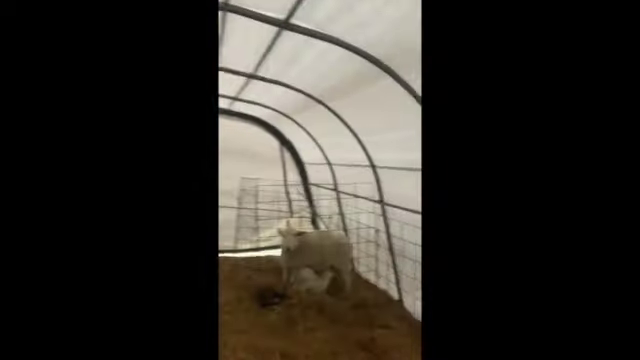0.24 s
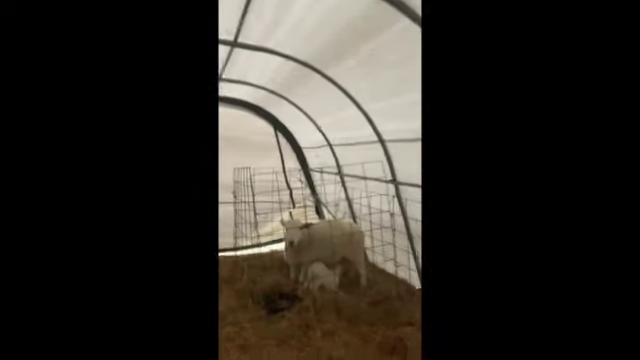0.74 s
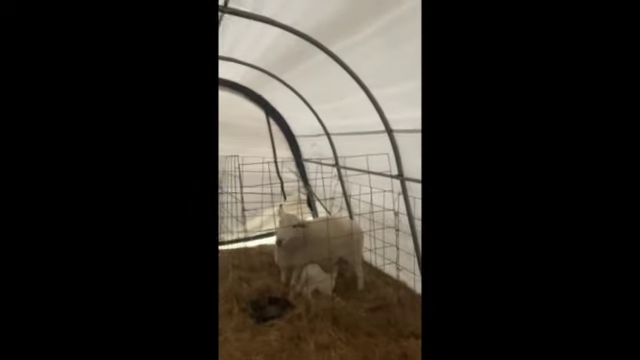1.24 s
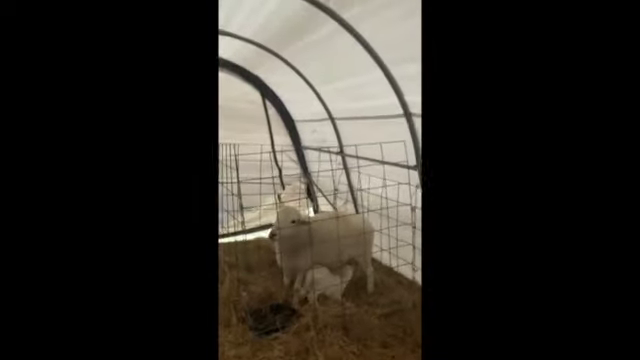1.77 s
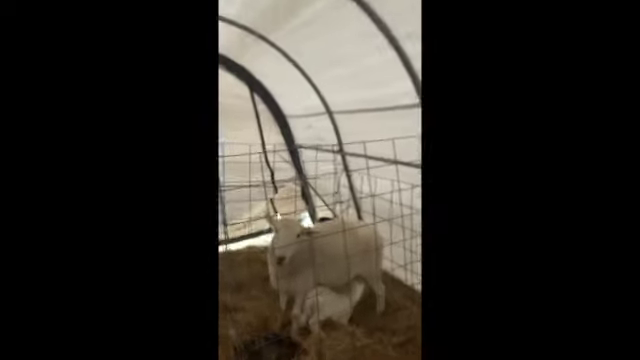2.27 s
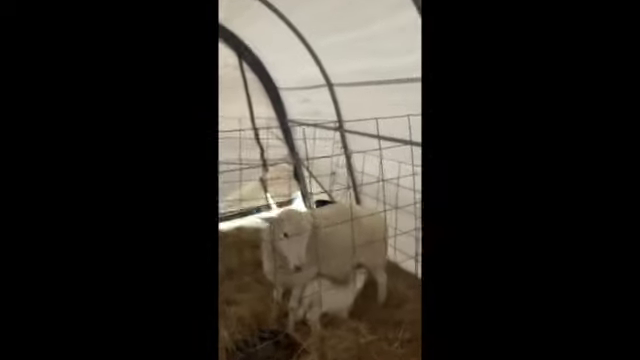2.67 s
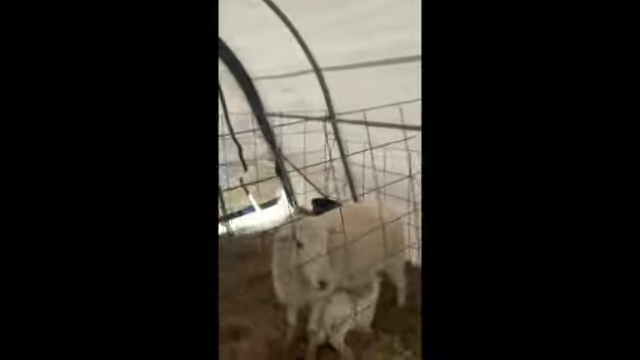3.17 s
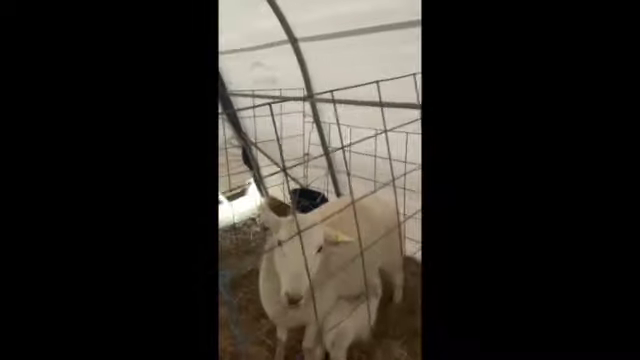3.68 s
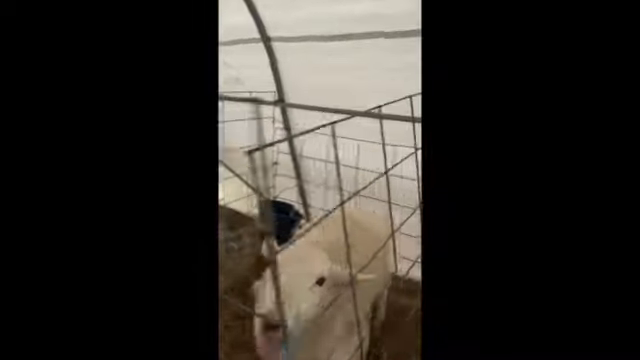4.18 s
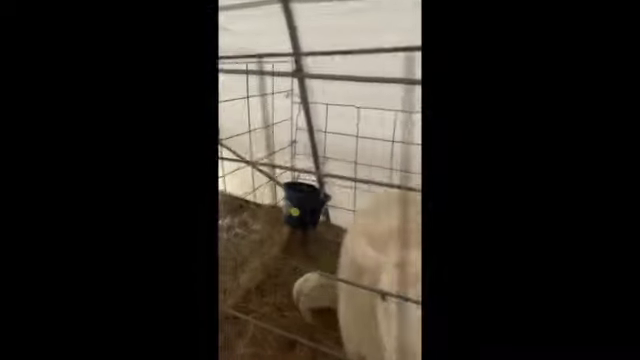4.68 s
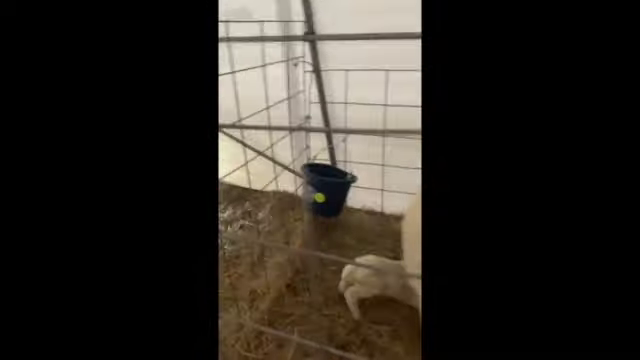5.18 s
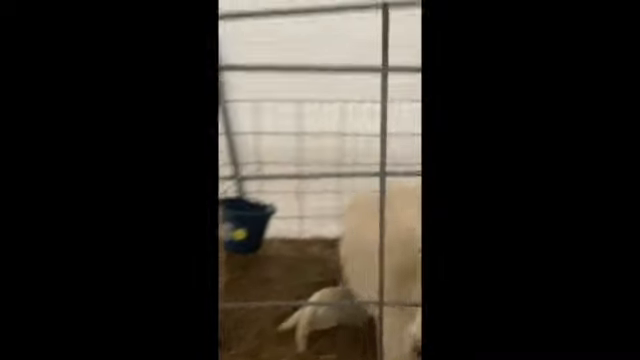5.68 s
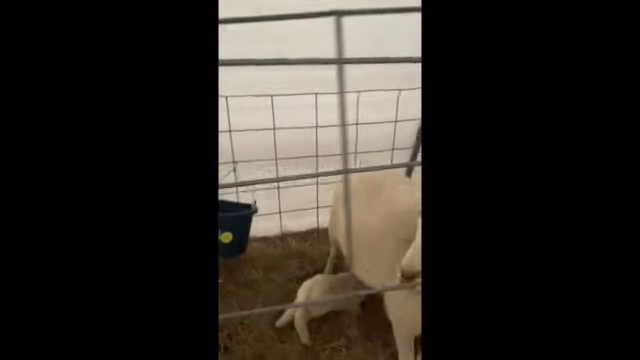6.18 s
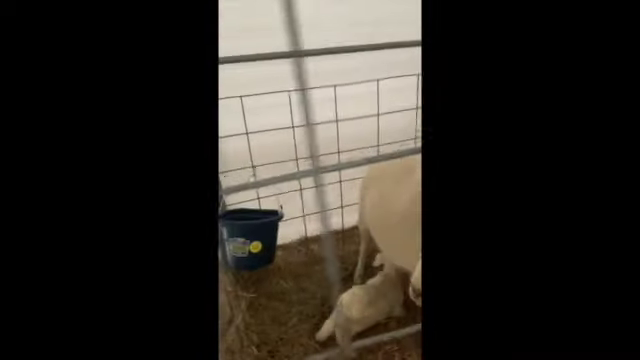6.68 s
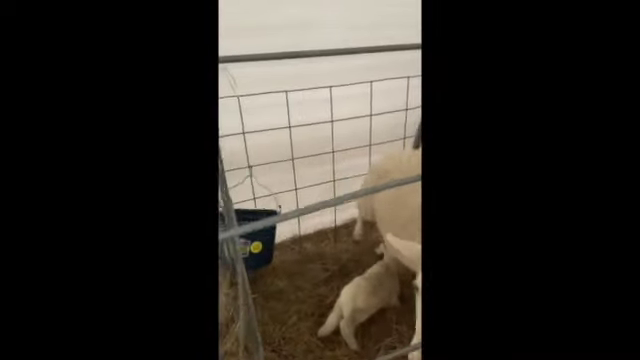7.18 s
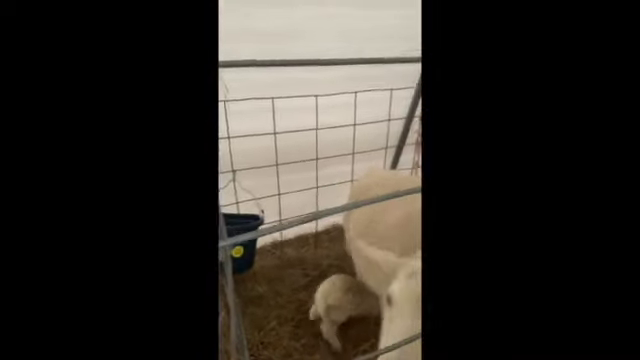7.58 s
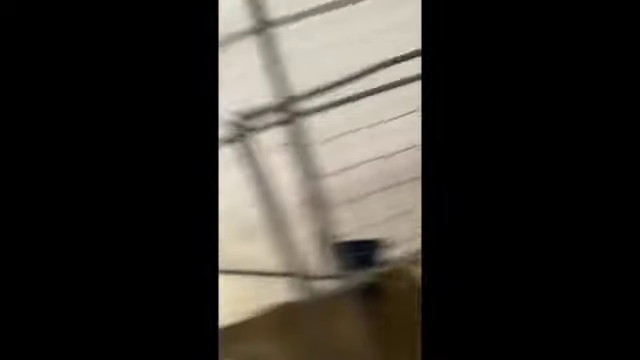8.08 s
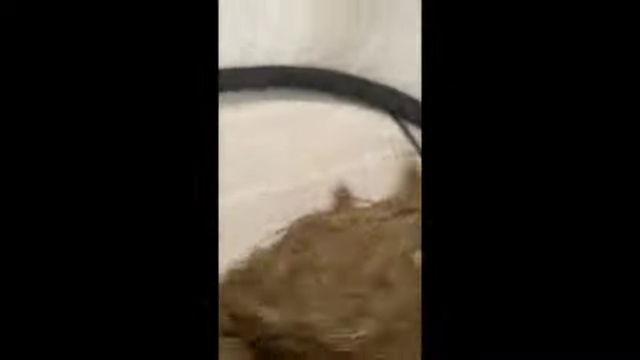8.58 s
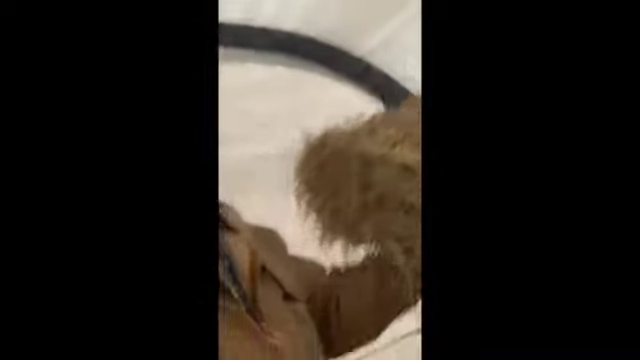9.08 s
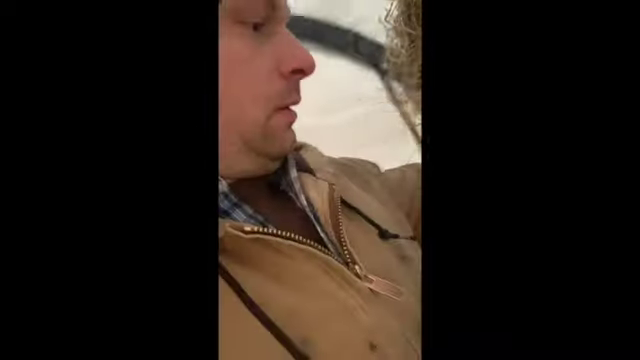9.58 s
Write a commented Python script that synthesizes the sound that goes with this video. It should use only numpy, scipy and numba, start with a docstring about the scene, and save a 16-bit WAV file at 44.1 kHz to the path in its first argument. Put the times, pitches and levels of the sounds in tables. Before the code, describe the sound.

Hooves shuffle and crunch in straw, then a single hoarse, throbbing sheep bleat, followed by quiet hay rustling, small knocks and snapping stalks.

```python
"""A ewe bleats in a straw shelter

A ewe in a straw-bedded tunnel shelter gives one rough, wavering bleat close by: pulses from her vocal
folds ring the resonances of mouth, throat and nose. Feet shuffle and thud in the bedding, dry hay rustles
and snaps: shaped noise with small cracks. A soft hollow swish, perhaps a sleeve rubbing, is noise through
a few resonances. Light knocks and bumps, some of them footfalls, are short damped notes. A few echoes and
a short tail place it all in the shelter."""
import sys
import numpy as np
from scipy import signal
from scipy.fft import rfft, irfft, next_fast_len
from scipy.io import wavfile
from numba import njit

SR = 44100
rng = np.random.default_rng(int(sys.argv[2]) if len(sys.argv) > 2 else 0)


def dump(signal):
    """Clip the signal to [-1, 1] and save it as 16-bit WAV at the path in sys.argv[1]."""
    limited = np.clip(np.atleast_2d(signal).T, -1, 1)
    pcm = np.round(limited * 32767).astype(np.int16)
    wavfile.write(sys.argv[1], SR, pcm)


N = 433944
TIME = np.arange(N) / SR


def from_db(db):
    """Decibels to gain."""
    return 10 ** (np.asarray(db) / 20)


def rms_one(x):
    """Scale to unit power."""
    return x / np.sqrt(np.mean(x ** 2) + 1e-20)


def in_time(rows):
    """Each column of a curve table at every sample."""
    s, *columns = np.transpose(rows)
    return [np.interp(TIME, s, column) for column in columns]


def colour(x, spectrum):
    """Filter by a table of frequency in Hz and level in dB."""
    hz, db = np.transpose(spectrum)
    size = next_fast_len(N)
    grid = np.maximum(np.fft.rfftfreq(size, 1 / SR), 1)
    gain = from_db(np.interp(np.log(grid), np.log(hz), db))
    return irfft(rfft(x, size) * gain, size)[..., :N]


def drift(rate):
    """Random wandering: straight lines between random values of spread 1, rate of them a second."""
    knots = rng.standard_normal(N // 8)
    return np.interp(TIME * rate, np.arange(len(knots)), knots)


def grainy(spectrum, grain_db, rate):
    """Coloured noise whose strength varies from grain to grain; rms 1."""
    grains = rng.standard_normal(N) * from_db(grain_db * drift(rate))
    return rms_one(colour(grains, spectrum))


def crackly(spectrum, grain_db, rate, cracks):
    """Grainy noise strewn with the separate cracks of single stalks; rms 1."""
    per_s, spread_db, level_db = cracks
    sizes = from_db(spread_db * np.minimum(rng.exponential(1, N), 4)) * rng.choice([-1, 1], N)
    struck = rng.random(N) < per_s / SR
    clicks = rms_one(colour(sizes * struck, spectrum))
    return rms_one(grainy(spectrum, grain_db, rate) + from_db(level_db) * clicks)


def butter(x, hz, kind, order):
    """Low- or high-pass."""
    return signal.sosfilt(signal.butter(order, min(hz, .45 * SR), kind, fs=SR, output="sos"), x + 1e-18)


def delayed(x, samples):
    """Shift later by a possibly fractional number of samples."""
    return np.interp(np.arange(N) - samples, np.arange(N), x, left=0)


def bursts(times, level_db, t60, rise_s):
    """Envelope of blows that rise quickly and die away by 60 dB in t60 seconds."""
    out = np.zeros(N)
    for s, db, decay in zip(times, level_db, t60):
        start = int(s * SR)
        age = TIME[:min(SR // 2, N - start)]
        out[start:start + len(age)] += from_db(db - 60 * age / decay) * (1 - np.exp(-age / rise_s))
    return out


def swells(rows):
    """Power of movements that each swell and fade like a bell curve."""
    power = np.zeros(N)
    for s, half, db in rows:
        near = slice(max(int((s - 5 * half) * SR), 0), int((s + 5 * half) * SR))
        power[near] += from_db(db) ** 2 * np.exp(-((TIME[near] - s) / half) ** 2)
    return power


@njit
def resonance(x, angle, r):
    """Two-stage resonance with steep flanks, gain 1 on top; its centre (radians a sample) may glide."""
    for stage in range(2):
        y = np.zeros(len(x))
        for i in range(2, len(x)):
            driven = (1 - r * r) / 2 * (x[i] - x[i - 2])
            y[i] = driven + 2 * r * np.cos(angle[i]) * y[i - 1] - r * r * y[i - 2] + 1e-18
        x = y
    return x


def formant(x, hz, width):
    """Ring a resonance given by centre and width in Hz."""
    return resonance(x, np.full(N, 2 * np.pi / SR) * hz, np.exp(-np.pi * width / SR))


# Strokes of hay being handled. Each row: time of the height in seconds, half length in seconds,
# level in dB before the hay's own trim.
HAY_STROKES = [(.33, 0.24, -58), (.99, 0.04, -53), (1.15, 0.13, -57.5), (1.97, 0.21, -58),
               (2.31, 0.15, -54), (2.55, 0.055, -53.5), (2.79, 0.087, -51), (3.09, 0.14, -54.5),
               (3.33, 0.076, -47), (3.53, 0.057, -53.5), (3.9, 0.24, -53), (4.55, .25, -56),
               (5.45, 0.19, -57.5), (5.84, 0.11, -54), (6.35, 0.19, -52.5), (6.71, 0.049, -52),
               (7.08, 0.23, -55), (7.42, 0.18, -53), (8.0, 0.19, -57), (8.07, 0.027, -50.5),
               (8.31, 0.1, -51), (8.58, .1, -46.5), (9.03, 0.24, -48), (9.42, 0.11, -53),
               (9.68, 0.13, -50.5)]
# Feet dragging through the straw. Each row: time of the height in seconds, half length in seconds,
# level in dB before the shuffle's own trim.
DRAGS = [(.01, 0.09, -52.5), (.35, 0.19, -59), (1.22, 0.24, -60.5), (1.99, 0.066, -47.5),
         (2.2, 0.092, -48.5), (2.74, 0.082, -47.5), (2.97, 0.82, -60), (3.875, .04, -51),
         (5.55, 0.22, -60.5), (8.48, 0.11, -59.5), (9.83, 0.1, -55)]


def movement():
    """Levels in dB before trim: handled hay stirs the straw a little, dragging feet shake the ground."""
    hay_floor_db, shuffle_floor_db, rumble_floor_db = -67, -66, -59.5  # what stays between movements
    hay_in_shuffle_db, drag_in_rumble_db = -13, -2
    strokes, drags = swells(HAY_STROKES), swells(DRAGS)
    hay = from_db(hay_floor_db) ** 2 + strokes
    shuffle = from_db(shuffle_floor_db) ** 2 + drags + from_db(hay_in_shuffle_db) ** 2 * strokes
    rumble = from_db(rumble_floor_db) ** 2 + from_db(drag_in_rumble_db) ** 2 * drags
    return 10 * np.log10([hay, shuffle, rumble])


# Spectrum of the low rumble. Each row: frequency in Hz, level in dB.
RUMBLE = [(20, -35), (35, -16.5), (55, 4), (80, 0.5), (125, -4), (200, -9.5), (400, -31), (1000, -44)]


def low_rumble(level_db, trim_db=1):
    """Deep noise that never quite stops and grows as dragging feet shake the ground."""
    return from_db(level_db + trim_db) * grainy(RUMBLE, grain_db=2.0, rate=150)


# Spectrum of shuffling feet. Each row: frequency in Hz, level in dB.
SHUFFLE = [(100, -1.5), (180, 0.5), (240, 1.5), (320, 5.5), (450, 1), (800, -3), (1050, -3.5), (1500, -1.5),
           (1900, -3.5), (2400, -5), (3500, -5), (6000, -16.5), (15000, -31.5)]
# Single stalks cracking in hay and shuffled straw. The row: cracks per second, spread of sizes in dB,
# level in dB relative to the noise of the layer.
HAY_CRACKS = (260, 4.2, -8.5)


def shuffling(level_db, trim_db=2.0):
    """Feet drag through straw: the harder they drag, the more unevenly it crumbles."""
    crumble_db = np.interp(level_db, [-62, -46], [1.5, 4])
    strength = from_db(level_db + trim_db + crumble_db * drift(140))
    return strength * crackly(SHUFFLE, grain_db=1.5, rate=560, cracks=HAY_CRACKS)


# Spectrum of sliding hay. Each row: frequency in Hz, level in dB.
HAY = [(600, -24), (1800, -15), (3000, -11), (5000, -6), (7500, -2), (10000, 0), (12000, -4), (15500, -3)]


def sliding_hay(level_db, trim_db=5.0):
    """Dry stalks slide over each other: bright noise full of tiny cracks."""
    strength = from_db(level_db + trim_db + 1.4 * drift(54))
    return strength * crackly(HAY, grain_db=1.0, rate=2400, cracks=HAY_CRACKS)


# Dry stalks snapping. Each row: start in seconds, level in dB before trim, time to fall 60 dB in seconds.
SNAPS = [(2.3246, -36, 0.14), (2.472, -25.5, 0.017), (2.732, -28.5, 0.066), (6.4238, -28, 0.024),
         (7.141, -28, 0.044), (8.336, -25.5, 0.036), (8.452, -23.5, 0.075), (8.4634, -47, 0.05),
         (8.506, -20.5, 0.017), (8.558, -25, 0.079), (8.616, -27.5, 0.099), (8.6714, -38.5, 0.06)]
# Spectrum of a snapping stalk. Each row: frequency in Hz, level in dB.
SNAP = [(600, -21), (1500, 0.5), (3000, 7), (6000, 6), (10000, 10), (15500, 1)]


def snapping_stalks(trim_db=-9):
    """A stalk breaks: a sudden burst of bright noise that dies away."""
    s, db, t60 = np.transpose(SNAPS)
    splinters = grainy(SNAP, grain_db=3.5, rate=1500)
    return bursts(s, db + trim_db, t60, rise_s=0.00066) * splinters


def rustling():
    """Hay stalks slide and snap, feet drag through the straw, and a low rumble lies beneath."""
    hay_db, shuffle_db, rumble_db = movement()
    return sliding_hay(hay_db) + snapping_stalks() + shuffling(shuffle_db) + low_rumble(rumble_db)


# A soft hollow swish, perhaps a sleeve rubbing. Each row: time of the height in seconds,
# half length in seconds, level in dB.
SWISHES = [(.2, 0.22, -60.5), (8.05, 0.057, -67), (8.96, 0.086, -48.5), (9.08, 0.16, -52),
           (9.79, 0.12, -58)]
# Its hollow resonances. Each row: frequency in Hz at rest, width in Hz, level in dB relative to each other.
SWISH_MODES = [(267, 140, 2), (880, 510, -13), (1550, 600, -10.5), (2204, 140, 0.5), (2610, 430, -7)]


def hollow_swish(catch_db=3):
    """Uneven friction excites a few hollow resonances, which rise a little as it presses harder."""
    pressure = np.sqrt(swells(SWISHES))
    bend = 1 + 0.028 * pressure / pressure.max()  # the hardest rub raises the resonances by 2.8 percent
    friction = rng.standard_normal(N) * from_db(catch_db * drift(70))
    hollow = sum(formant(friction * from_db(db), hz * bend, width) for hz, width, db in SWISH_MODES)
    return pressure * rms_one(hollow)


# Light knocks and bumps, some of them footfalls. Each row: start in seconds, level in dB,
# ringing note in Hz, time to fall 60 dB in seconds.
KNOCKS = [(0.8425, -42, 1110, 0.011), (3.704, -40, 1070, .04), (3.7115, -33.5, 1600, .02),
          (3.865, -39, 206, 0.2), (5.606, -41, 1040, .04), (5.619, -38, 1430, 0.046),
          (5.952, -39, 1350, 0.015), (5.9605, -40.5, 750, 0.036), (6.4235, -27, 1344, 0.025),
          (6.436, -34, 1294, .05), (6.656, -35.5, 1300, 0.026), (6.668, -41, 980, .05),
          (7.19, -48, 740, 0.075), (7.75, -45.5, 1706, 0.069), (8.2733, -25.5, 772, 0.027),
          (8.294, -38, 820, .04), (9.509, -38, 322, 0.034), (9.511, -42, 1120, 0.018)]
# Spectrum of pressed straw, also the contact noise of a knock. Each row: frequency in Hz, level in dB.
PRESS = [(150, -18), (350, 1.5), (600, 2.5), (1000, 2.5), (1500, 0.5), (2000, -8), (3500, -37)]


def knocks(contact_db=-9, overtone_ratio=1.6, overtone_db=-9):
    """Each knock rings a short, damped note and its overtone over the noise of the contact."""
    contact = from_db(contact_db) * grainy(PRESS, grain_db=-1.5, rate=350)
    out = np.zeros(N)
    for s, db, hz, t60 in KNOCKS:
        near = slice(int(s * SR), int(s * SR) + SR // 4)
        turn = 2 * np.pi * hz * (TIME[near] - s)
        note = np.sin(turn) + from_db(overtone_db) * np.sin(overtone_ratio * turn)
        out[near] += bursts([s], [db], [t60], rise_s=0.00049)[near] * (note + contact[near])
    return out


# Footfalls in the bedding. Each row: start in seconds, level in dB, then thud and crunch in dB relative
# to that level; all before the trims of the three parts.
STEPS = [(0.841, -31.5, -1.5, -52), (0.872, -57, 0, -27), (1.864, -41.5, -14, -19), (1.902, -26, -11, -14),
         (1.945, -31.5, -4, -17), (1.976, -24, -1.5, -25), (2.05, -32.5, -0.5, -15),
         (2.122, -32.5, -13, -4), (2.185, -37, 0, -5), (2.22, -52, 8, -12), (2.357, -38, 3.5, 0),
         (2.399, -36.5, -2, -3), (2.487, -31, -8, -20), (2.525, -54, 7, -10), (2.604, -37.5, 0.5, 0),
         (2.645, -24.5, -5.5, -3), (2.689, -36.5, -6, 4), (2.79, -49, 6, -12), (2.821, -48, 11, -17),
         (2.855, -49, 6, -12), (2.93, -38.5, -8, -3), (2.959, -34.5, -2, -23), (3.149, -34, -2, -9),
         (3.19, -45, -1, -2), (3.279, -40, -22, 2), (3.393, -36, 2, -26), (3.703, -32, -7, -10.5),
         (3.816, -41.5, -10, 2), (3.85, -36, -10, -8.5), (4.825, -42, -9.5, -5), (5.283, -41.5, 0.5, -4),
         (5.591, -34, -7, -3), (5.608, -42, -1, -2), (5.85, -42, -26, -19), (5.953, -37, -10, -14),
         (6.007, -43.5, -2, -24), (6.422, -40.5, -14, 8.5), (6.654, -37.5, -5.5, -11),
         (7.975, -52.5, 8.5, -16.5), (8.88, -39.5, -4, -6), (9.08, -40.5, -10, -4), (9.577, -53.5, 12, -12)]
# Spectrum of the thud on the ground. Each row: frequency in Hz, level in dB.
THUD = [(40, -10), (90, -0.5), (150, 5), (240, -9.5), (340, -0.5), (520, -12), (1000, -48)]
# Spectrum of the crunch at the top of the straw. Each row: frequency in Hz, level in dB.
CRUNCH = [(1000, -19), (2000, -3), (2800, 5.5), (4200, -7.5), (8000, -22), (16000, -35)]
# Single stalks cracking underfoot. The row: cracks per second, spread of sizes in dB,
# level in dB relative to the noise of the layer.
STRAW_CRACKS = (350, 3.5, -4)


def footfalls(press_db=-10, thud_db=-5.0, crunch_db=-11, crumble_db=2,
              thud_t60=0.2, press_t60=0.16, crunch_t60=0.17):
    """A hoof or boot thuds, presses the straw and crunches its top; the straw gives way in jerks."""
    s, db, low_db, high_db = np.transpose(STEPS)
    each = np.ones(len(s))
    thud = bursts(s, db + low_db + thud_db, thud_t60 * each, rise_s=0.0023)
    thud = thud * grainy(THUD, grain_db=-1.0, rate=150)
    press = bursts(s, db + press_db, press_t60 * each, rise_s=0.00064)
    press = press * crackly(PRESS, grain_db=0.0, rate=480, cracks=STRAW_CRACKS)
    crunch = bursts(s, db + high_db + crunch_db, crunch_t60 * each, rise_s=0.00087)
    crunch = crunch * crackly(CRUNCH, grain_db=4.5, rate=770, cracks=STRAW_CRACKS)
    return thud + (press + crunch) * from_db(crumble_db * drift(110))


VOICE_STARTS_S, VOICE_STOPS_S = 3.891, 4.657
TOP_S = 4.27  # the pitch arch is highest here
# Strained moments when the folds slap harder and more air tears through. Each row: time of the height in
# seconds, half length in seconds, level in dB relative to the usual edge.
RASPS = [(3.945, 0.032, 0), (4.009, 0.0053, 4), (4.05, 0.0068, -2.5), (4.124, 0.0059, -5),
         (4.228, .01, 0.5), (4.397, .005, 6.5), (4.597, 0.016, 5)]


def bleat_gesture():
    """Pitch in Hz, effort in dB and edge in dB: the bleat scoops up, arches, sags and is cut off."""
    top_hz, arch_hz_per_s2, scoop_hz, scoop_s, drop_hz_per_s = 127.2, 58, 61.94, .04, 250
    first_push, attack_s = 0.053, 0.14  # share of full breath pressure at the start; pace of its rise
    loudest_db, sag_db_per_s, release_db_per_s = 5, 5.5, 330
    edge_db_per_s = 2.5  # the upper resonances grow harder as it goes on
    age = np.clip(TIME - VOICE_STARTS_S, 1e-4, 1)
    from_top = age + VOICE_STARTS_S - TOP_S
    late = np.clip(TIME - 4.63, 0, .1)  # seconds into the cut-off
    pitch = top_hz - arch_hz_per_s2 * from_top ** 2 - scoop_hz * np.exp(-age / scoop_s)
    pitch = pitch - drop_hz_per_s * late
    attack_db = 29 * np.log10(np.minimum(first_push + age / attack_s, 1))
    effort_db = loudest_db + attack_db - sag_db_per_s * age - release_db_per_s * late
    edge_db = edge_db_per_s * from_top + 10 * np.log10(1 + swells(RASPS))
    return pitch, effort_db, edge_db


# Throbs of the larynx that make the bleat waver. Each row: time of the height in seconds, half length in
# seconds, swell in dB before each part of the voice takes its share, pitch rise in Hz.
THROBS = [(3.936, .009, 5, 7.7), (4.005, .016, 7, 9.7), (4.02, 0.013, -1, 4), (4.061, .016, 8, 4),
          (4.117, .015, 8.5, 11), (4.186, 0.013, 10.5, 9.6), (4.223, .011, 10, 12), (4.256, 0.014, 4.5, 4),
          (4.311, 0.019, 7, 5.06), (4.39, 0.022, 7.5, 10), (4.467, .012, 7.5, 18.7), (4.521, 0.013, 5, 14)]


def throb(pitch):
    """The larynx throbs: the pitch jumps just before the level does."""
    pitch_lead_s = .006
    swell_db = np.zeros(N)
    for s, half, db, rise_hz in THROBS:
        away = np.minimum(((TIME - s) / half) ** 2, 9)
        # the level of a throb has a flat top, its pitch a round one
        swell_db = swell_db + db * np.exp(-away * away)
        pitch = pitch + rise_hz * swells([(s - pitch_lead_s, half, 0)])
    return pitch, swell_db


def clicks(turn, pitch):
    """One click a cycle, shared between two samples; every harmonic has height 1."""
    steps = np.floor(turn) + np.minimum(turn % 1 * SR / pitch, 1)
    return np.diff(steps, prepend=0) * SR / pitch / 2


# Spectrum of the air rushing through the folds. Each row: frequency in Hz, level in dB.
BREATHINESS = [(100, 0), (500, -3), (900, -4), (2000, -5), (3500, -3), (5000, 3), (7000, 8), (10000, 8),
               (16000, 0)]


def rushing_air(cycles, open_at, force, pitch, swell_db):
    """Breath noise comes in two puffs a cycle, loudest about the closing, less as the folds part."""
    open_width = .16  # share of a cycle
    gate = 0
    for at, share in ((open_at, .8), (.08, 1)):
        gate = gate + share * np.exp(-(np.sin(np.pi * (cycles - at)) / (np.pi * open_width)) ** 2)
    noise = grainy(BREATHINESS, grain_db=-2.0, rate=390)
    return force * gate * noise * np.sqrt(SR / pitch) * from_db(.5 * swell_db)


# Jaw and tongue. Each row: time in seconds, then first, second and third resonance in Hz.
MOUTH = [(3.9, 600, 1430, 2970), (3.96, 650, 1480, 2850), (4.02, 684, 1490, 2790), (4.12, 675, 1450, 2800),
         (4.22, 670, 1490, 2822), (4.33, 670, 1466, 2960), (4.45, 654, 1472, 2830), (4.56, 660, 1370, 2906),
         (4.615, 631, 1340, 3010), (4.655, 539, 1317, 3040)]
# The three moving resonances. Each row: width in Hz, level in dB, share of the throb swell,
# share of the edge, fade in dB per second.
MOUTH_MODES = [(185.7, -20, 1.1, 0, -2), (290, -23, 0.53, .1, 7), (270, -27, 0.3, 0.88, -0.5)]
# Fixed resonances of throat and nose. Each row: frequency in Hz, width in Hz, level in dB,
# share of the throb swell, share of the edge.
THROAT = [(130, 90, -48, .7, 0), (250, 80, -39, .4, 0), (400, 110, -33, .9, 0), (535, 130, -36.5, 1.2, 0),
          (785, 100, -33.5, .6, 0), (1010, 150, -43.5, .6, 0), (1260, 260, -39, .7, 0),
          (2000, 550, -36, .6, .2), (2450, 400, -39, .5, .5), (3450, 550, -35.5, .25, 1),
          (4100, 900, -32, .3, 1), (6100, 1400, -52, .6, .5), (8400, 3500, -62, .7, .9)]
# The sense in which each resonance swings, plus or minus one: mouth first, then throat and nose.
SENSES = [1, 1, -1, -1, 1, -1, 1, -1, -1, -1, -1, 1, 1, -1, 1, -1]
# The voice hums through the nose, briefly early on and longer as the mouth closes. Each row: time of the
# height in seconds, half length in seconds, level in dB.
HUMS = [(4.008, 0.011, -30.5), (4.635, 0.026, -31.5)]
# Spectrum of the dry crack of the folds, heard past the resonances. Each row: frequency in Hz, level in dB.
SLAP = [(1000, -60), (2000, -41), (3000, -39), (3800, -40), (4800, -61), (6300, -56), (9500, -67),
        (12000, -79), (16000, -84)]
# Spectrum of the air that leaks between the closings. Each row: frequency in Hz, level in dB.
HOARSE = [(900, -16.5), (1500, -6.5), (2000, -4), (2600, -1.5), (3200, -3), (3900, -13.5), (5000, -26),
          (7000, -23), (10000, -26.5), (15000, -42.5)]
# It leaks most while the voice is catching. Each row: time of the height in seconds, half length in
# seconds, level in dB relative to the usual leak.
LEAKS = [(3.94, 0.045, 11), (4.06, .02, 3), (4.23, 0.019, 2)]


def ewe(shimmer_db=2.5, closing_hz=6200, open_at=.64, flap_db=0, flap_s=4.32, flap_half_s=.14,
        flap_low_hz=1800, flap_high_hz=3800):
    """Vocal folds slap shut once a cycle and flap open with a puff of air; both ring the throat."""
    jitter, jitter_per_db = .005, .0013  # unevenness of the cycles, at rest and per dB of throb
    air_db, hoarse_db, slap_swell = -12, -36, .7  # the last: share of the throb swell the crack follows
    lips_s, lips_close_s, nasal_hz, muffle_db_per_octave = 4.628, .018, 250, 7
    pitch, effort_db, edge_db = bleat_gesture()
    pitch, swell_db = throb(pitch)
    sounding = (TIME > VOICE_STARTS_S) & (TIME < VOICE_STOPS_S)
    unevenness = 1 + (jitter + jitter_per_db * swell_db) * drift(130)
    cycles = np.cumsum(sounding * pitch * unevenness) / SR
    force = sounding * from_db(effort_db + shimmer_db * drift(130))
    shutting = force * clicks(cycles, pitch)
    closing = butter(shutting, closing_hz, "low", order=2)
    # the folds flap open hardest in the middle of the call; that moment wanders slowly within the cycle
    opening = force * clicks(cycles - open_at + .035 * drift(22), pitch) * from_db(2 * drift(40))
    opening = opening * np.sqrt(swells([(flap_s, flap_half_s, flap_db)]))
    cracks = (shutting + opening / 2) * from_db(3.5 * drift(130))
    opening = butter(butter(opening, flap_low_hz, "high", order=2), flap_high_hz, "low", order=4)
    air = rushing_air(cycles, open_at, force, pitch, swell_db)
    source = closing + opening + from_db(air_db) * air * np.sqrt(1 + swells(RASPS))
    # the lips shut, muffling the voice above the nasal hum
    shut = np.clip((TIME - lips_s) / lips_close_s, 0, 1)

    def ring(hz, width, db, share, edge):
        """One resonance sounded by the folds."""
        muffle_db = shut * muffle_db_per_octave * np.log2(np.maximum(hz / nasal_hz, 1))
        return formant(source * from_db(db + share * swell_db + edge * edge_db - muffle_db), hz, width)

    from_top = np.clip(TIME - TOP_S, -1, 1)
    mouth = [(hz, width, db - fade * from_top, share, edge)
             for hz, (width, db, share, edge, fade) in zip(in_time(MOUTH), MOUTH_MODES)]
    voice = sum(sense * ring(*mode) for sense, mode in zip(SENSES, mouth + list(THROAT)))
    hum = formant(source * np.sqrt(swells(HUMS)), nasal_hz, 90)
    # uneven cracks and leaking air leave only through the open mouth
    slap = colour(cracks * from_db(edge_db + slap_swell * swell_db), SLAP)
    leak = force * from_db(hoarse_db) * np.sqrt(1 + swells(LEAKS))
    hoarse = leak * grainy(HOARSE, grain_db=3, rate=550)
    return voice + hum + (1 - shut) * (slap + hoarse)


# Echoes off the ground and the arched cover. Each row: delay in seconds, level in dB.
ECHOES = [(.0046, -29.5), (0.0114, -20), (.019, -17.5)]


def shelter(x, tail_t60_s=.12, tail_db=-10, left_lag=5):
    """Straw soaks up sound: a few echoes, then a short tail that differs at each microphone."""
    direct = x + sum(from_db(db) * delayed(butter(x, 7700, "low", order=1), s * SR) for s, db in ECHOES)
    age = TIME[:SR // 3]
    fade = from_db(-60 * age / tail_t60_s) * (1 - np.exp(-age / 0.002))
    tails = rng.standard_normal((2, len(age))) * fade
    tails /= np.sqrt(np.sum(tails ** 2, axis=1, keepdims=True))
    # long waves pass out through the thin cover, short ones are lost in the straw
    kept = butter(butter(x, 400, "high", order=1), 5000, "low", order=2)
    reverb = signal.fftconvolve(kept[None], tails, axes=1)[:, :N]
    # the left microphone hears the direct sound and echoes a few samples later
    return np.array([delayed(direct, left_lag), direct]) + from_db(tail_db) * reverb


def scene(scatter_db=-16):
    """All sources sound in the shelter; extra rustle from all around differs between the microphones."""
    scattered = from_db(scatter_db) * rustling() * np.array([[1], [-1]])
    return shelter(rustling() + hollow_swish() + knocks() + footfalls() + ewe()) + scattered


def gain_control(x, threshold_db=-30, share=0.3, attack_s=0.049, release_db_per_s=13):
    """Turn loud sound down quickly and come back slowly."""
    keep = np.exp(-1 / (attack_s * SR))
    power = signal.lfilter([1 - keep], [1, -keep], np.mean(x ** 2, axis=0))
    level_db = 10 * np.log10(power + 1e-12)
    over_db = share * np.maximum(level_db - threshold_db, 0)
    # each cut is held by a running maximum that slopes back at the release rate
    recovery_db = release_db_per_s * TIME
    return x * from_db(recovery_db - np.maximum.accumulate(over_db + recovery_db))


# Colour of the two microphones. Each row: frequency in Hz, left minus right in dB.
BALANCE_DB = [(60, -.5), (200, -1), (380, -4), (700, -2.5), (1300, -2.5), (2400, 2.3), (3300, 1), (4400, 0),
              (15000, 0)]


def record(dry, cutoff_hz=15900):
    """Duck loud sound, colour the two microphones, round the highest peaks and cut the top."""
    tilted = []
    for x, side in zip(gain_control(dry), (1, -1)):
        tilt = [(hz, side * db / 2) for hz, db in BALANCE_DB]  # half of the difference on each side
        tilted.append(colour(x, tilt))
    tilted = np.array(tilted)
    rounded = tilted / (1 + (tilted / .92) ** 6) ** (1 / 6)
    return signal.sosfilt(signal.ellip(10, .2, 80, cutoff_hz, fs=SR, output="sos"), rounded)


dry = scene()
out = record(dry)
dump(out)
```